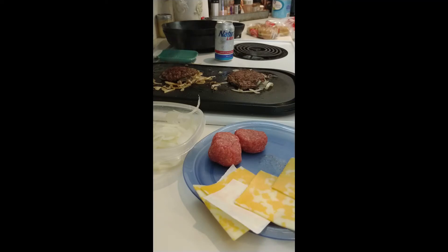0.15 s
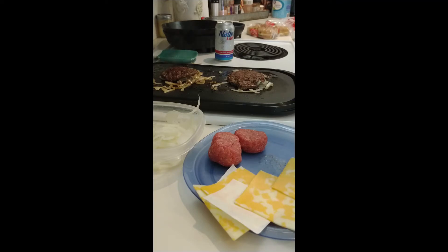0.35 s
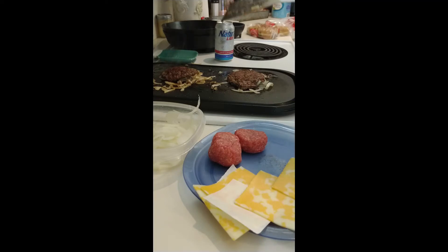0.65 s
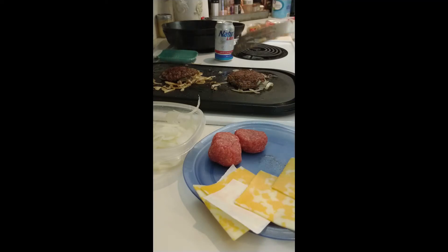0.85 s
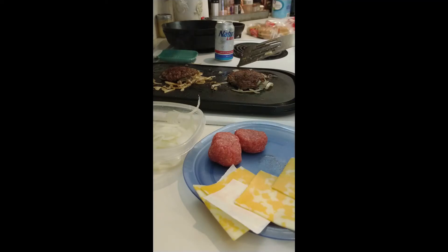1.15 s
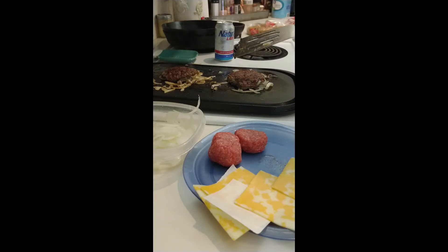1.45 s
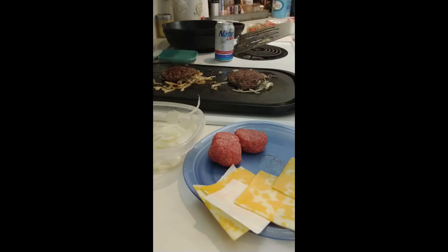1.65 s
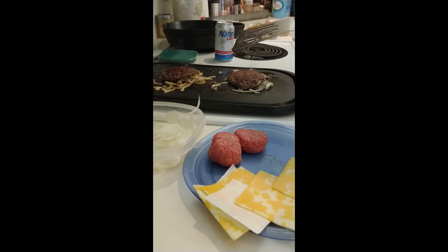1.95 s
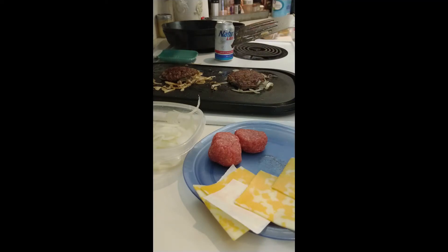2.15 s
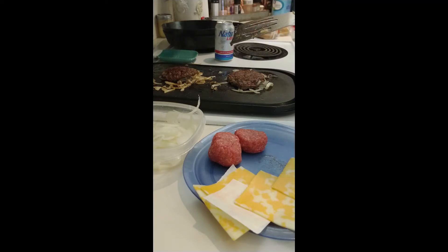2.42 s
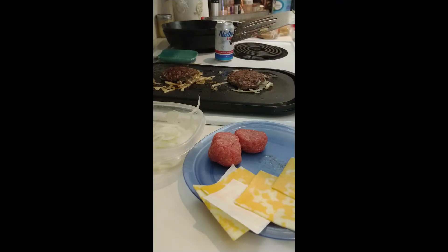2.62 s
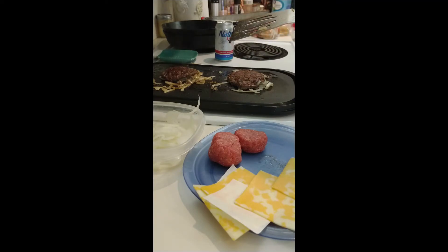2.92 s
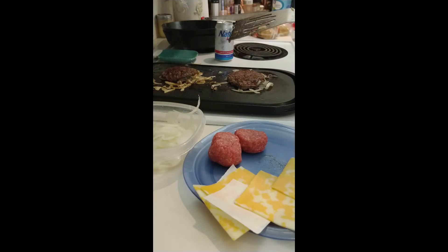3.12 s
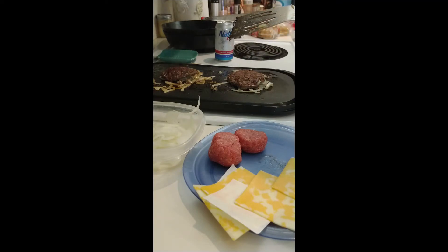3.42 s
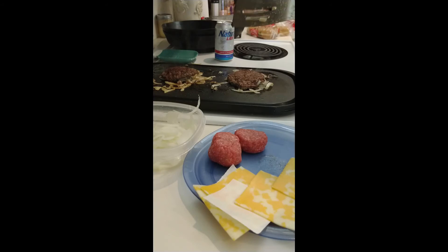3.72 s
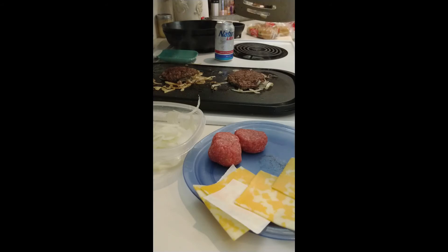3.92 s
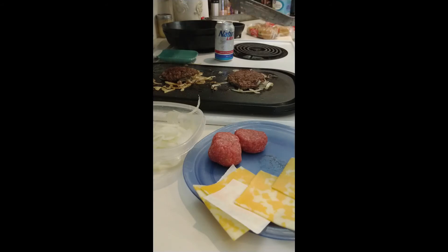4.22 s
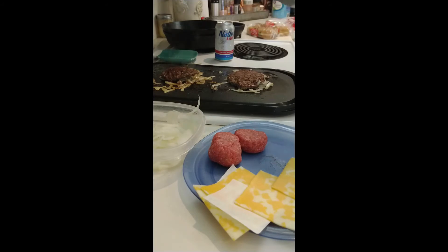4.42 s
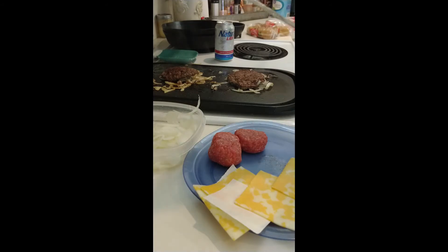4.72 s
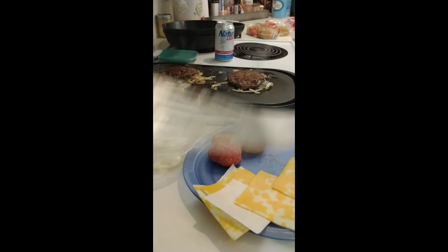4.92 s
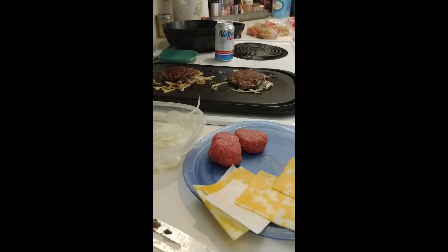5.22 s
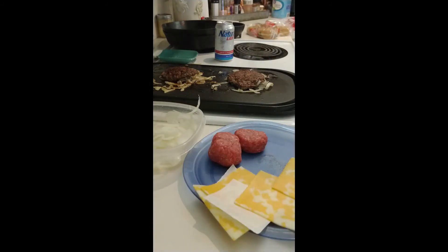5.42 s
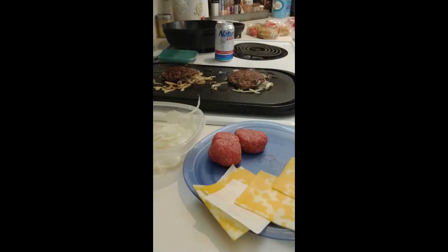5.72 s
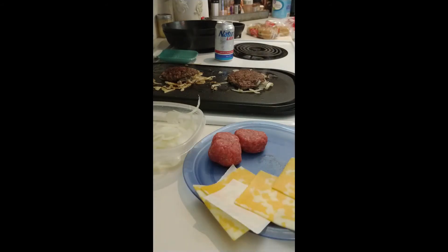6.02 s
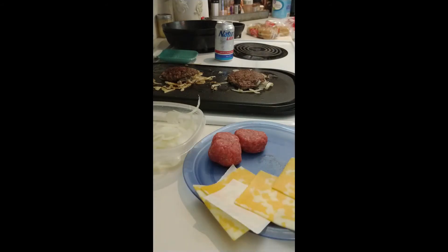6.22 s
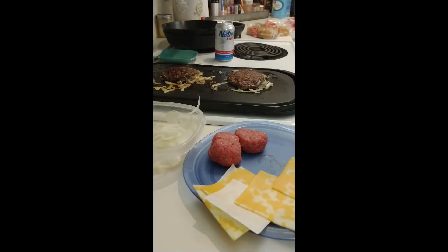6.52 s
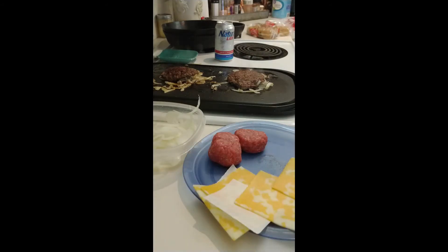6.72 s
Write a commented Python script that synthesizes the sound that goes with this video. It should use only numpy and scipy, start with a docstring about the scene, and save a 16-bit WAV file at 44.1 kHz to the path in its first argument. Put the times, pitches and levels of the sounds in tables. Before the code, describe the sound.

From the start, burgers and onions are already frying on a griddle straight ahead, close and wide in stereo, in a small kitchen. The sizzle is bright and dense, fine fizz over grainy crackle, with faint low bubbling in irregular surges. It is briskest around 0.75 s, dips briefly near 3.5 s, recovers, and eases around 5 s. Sharper spits snap at about 0.4, 0.5, 1.7, 2.3, 3.8 and 4.9 s, with weaker ones between. Soft, low, downward-sagging plops come at 0.2, 0.65, 1.1, 1.6, 2.5 and 4.6 s, among others. At 5.85 s a metal spatula touches the counter with a clank and tiny scrape, drops harder at 5.98-6.01 s, then rattles with woody thuds until 6.19 s. Its short boom fades into the room; the sizzle goes on, a little weaker, to about 7 s over barely audible rumble.

```python
"""Burger patties and onions sizzle on an electric griddle in a small kitchen, in spurts, with louder spits
and soft low plops; near the end a metal spatula is put down on the counter, drops and rattles to rest.
Sizzle: tens of thousands of random bubble bursts a second, by size class, through dense reflections.
Spits are filtered clicks, plops gliding sines; the spatula is struck modes, noise ticks and rasps.
A closely spaced microphone pair with stereo widening hears the griddle; faint rumble lies below."""
import sys
import numpy as np
from scipy import signal
from scipy.fft import rfft, irfft
from scipy.io import wavfile

SR = 44100
rng = np.random.default_rng(int(sys.argv[2]) if len(sys.argv) > 2 else 0)


def log_audio(samples):
    """Write samples as a 16-bit WAV file to the path given in sys.argv[1]."""
    # one column per channel
    frames = np.atleast_2d(samples).T
    # limit to full scale, then quantise
    limited = np.clip(frames, -1, 1)
    pcm = np.round(limited * 32767).astype(np.int16)
    wavfile.write(sys.argv[1], SR, pcm)


N = 302516

MIC_LAG_S = 20 / 44100  # travel time between the microphones
CONTACT_S = 0.00097  # build-up time of a metal contact


def from_db(db):
    """Decibels to amplitude gain."""
    return 10 ** (np.asarray(db) / 20)


def pan(left_over_right_db):
    """Left and right gains for a level difference."""
    return from_db([[left_over_right_db / 2], [-left_over_right_db / 2]])


def rms_one(x):
    """Scale so that the mean of the channels has rms 1."""
    return x / np.sqrt(np.mean(np.atleast_2d(x).mean(0) ** 2) + 1e-20)


def at_hz(points, hz):
    """Read a table on a log-frequency axis."""
    points = np.array(points)
    return np.interp(np.log(hz + 1), np.log(points[:, 0]), points[:, 1])


def drift(corner_hz):
    """Slow random wander of rms 1: noise through a double pole, computed at SR / 40."""
    step = 40
    r = np.exp(-2 * np.pi * corner_hz * step / SR)
    noise = rng.standard_normal(N // step + 2002)
    slow = signal.lfilter([1], [1, -2 * r, r * r], noise)[2000:]  # settled part
    return np.interp(np.arange(N) / step, np.arange(len(slow)), rms_one(slow))


def colour(x, spectrum):
    """Causal minimum-phase filter with the given spectrum, by folding its cepstrum."""
    size = 4096
    level_db = at_hz(spectrum, np.fft.rfftfreq(size, 1 / SR))
    cepstrum = irfft(np.log(from_db(level_db)))
    fold = np.r_[1, np.full(size // 2 - 1, 2), 1, np.zeros(size // 2 - 1)]
    response = irfft(np.exp(rfft(cepstrum * fold)))
    return signal.oaconvolve(x, response[None], axes=1)[:, :x.shape[1]]


def diffuse(size):
    """White stereo noise with the left-right correlation of diffuse sound at the pair."""
    # diffuse field at the microphones: f/Hz, correlation
    likeness = [(100, 0.28), (220, 0.034), (320, 0.51), (450, -0.34), (700, 0.63), (1100, -0.3),
                (1600, 0.59), (2300, -0.88), (3300, 0.59), (5000, -0.084), (15000, 0.16)]
    mid, side = rfft(rng.standard_normal((2, size)))
    alike = np.clip(at_hz(likeness, np.fft.rfftfreq(size, 1 / SR)), -1, 1)
    common = np.sqrt(1 + alike) * mid
    opposite = np.sqrt(1 - alike) * side * [[1], [-1]]
    return irfft((common + opposite) / np.sqrt(2), size)


def scatter(t60_s):
    """A dying cloud of reflections with energy of about 1 per channel."""
    t = np.arange(SR // 2) / SR
    decay = from_db(-60 * t / t60_s)
    return diffuse(len(t)) * decay / np.linalg.norm(decay)


def through(x, response):
    """Send a signal through a stereo impulse response."""
    return signal.fftconvolve(np.atleast_2d(x), response, axes=1)[:, :N]


def strikes(times_s, levels_db):
    """One click per event."""
    clicks = np.zeros(N)
    clicks[np.round(times_s * SR).astype(int)] = from_db(levels_db)
    return clicks


def resonate(x, peaks):
    """A chain of peaking filters, one per resonance."""
    for hz, width_hz, boost_db in peaks:
        w = 2 * np.pi * hz / SR
        a = np.pi * width_hz / SR * np.sinc(2 * hz / SR)
        g = from_db(boost_db)
        x = signal.lfilter([1 + a * g, -2 * np.cos(w), 1 - a * g], [1 + a, -2 * np.cos(w), 1 - a], x)
    return x


def rumble(level_db=-71.5, waver_db=1.8, flutter_db=2.0, pan_db=-4.0):
    """Faint low kitchen noise: coloured diffuse noise with a slow waver and a faster flutter."""
    # colour of the rumble: f/Hz, relative level/dB
    rumble_colour = [(25, -20), (60, -23), (90, -11), (118, -2.5), (155, 2), (195, -3), (280, 9.5),
                     (350, 4), (410, 1.5), (510, -12.5), (900, -43)]
    floor = rms_one(colour(diffuse(N), rumble_colour))
    wander_db = level_db + waver_db * drift(3.1) + flutter_db * drift(22)
    return floor * from_db(wander_db) * pan(pan_db)


def ring(times_s, levels_db, modes, detune):
    """Each contact excites decaying modes, each with a random strength and slight pitch shift."""
    # phase by which modes reach the left microphone late: f/Hz, phase/rad
    left_late = [(130, 1.2), (230, 1.8), (340, 1.9), (450, 1.3), (600, 1.0), (1100, 1.1)]
    uneven_db = 1.5
    out, t = np.zeros((2, N)), np.arange(SR // 3) / SR
    hz, mode_db, t60_s, pan_db = np.transpose(modes)[:, :, None]
    left = from_db(pan_db / 2) * np.exp(-1j * at_hz(left_late, hz))
    sides = np.hstack([left, from_db(-pan_db / 2)]).T
    decay = from_db(mode_db - 60 * t / t60_s)
    # low modes take longer to build up: half a cycle on top of the contact
    envelope = decay * (1 - np.exp(-(t / (CONTACT_S + .5 / hz)) ** 2))
    for s, level_db in zip(times_s, levels_db):
        start = round(s * SR)
        strength, shift = rng.standard_normal((2, len(modes)))
        tones = envelope * np.exp(2j * np.pi * hz * (1 + detune * shift[:, None]) * t)
        gains = sides * from_db(level_db + uneven_db * strength)
        out[:, start:start + len(t)] += np.imag(gains @ tones)
    return out


def handle(counter_db=-2, knock_db=-1, knock_pan_db=-7, rattle_db=-11, rattle_t60_s=0.051):
    """The handle bounces on the counter: a dull pulse each time, then the boom of the counter's modes."""
    # bounces, before the common offsets: t/s, boom/dB, body/dB, hard knock/dB
    thuds = [(5.853, -49, -36, -32), (5.861, -32, -27, -36), (5.87, -55, -45, -24.5),
             (5.98, -52, -32, -24.5), (5.99, -30, -27.5, -24), (6.0124, -22.5, -23.5, -20.5),
             (6.067, -22, -30, -26.5), (6.076, -30, -24, -24.5), (6.085, -31, -36, -28.5),
             (6.111, -30, -19.5, -28), (6.134, -40, -31, -34), (6.16, -44, -34, -33.5),
             (6.189, -44, -50, -45)]
    # where boom, body and hard knock drive the modes: f/Hz
    thud_hz = (150, 330, 500)
    # counter modes: f/Hz, relative level/dB, t60/s, left over right/dB
    counter = [(131, -3, 0.13, -9), (165.5, -8.5, 0.25, -7), (214.4, -11.5, 0.26, -10), (306, -8, 0.1, -9),
               (312.4, -13, 0.22, -6), (334, 0, 0.14, -3.5), (406, -9.5, 0.082, -13),
               (456, -7, 0.092, -10.5), (516, -14.5, 0.21, 9), (559, -10, 0.17, 3.5), (627, -18.5, 0.3, -3),
               (690, -24, 0.1, -7), (757, -12, 0.056, -3), (930, -15, 0.056, 2)]
    # colour of a dull knock: f/Hz, relative level/dB
    knock_colour = [(25, -24), (65, -44), (95, -32), (130, -4), (260, -1), (480, 6), (700, 7.5), (900, 3),
                    (1450, 1.5), (2200, -27), (3500, -26), (8000, -54)]
    times_s, *_, hard_db = np.transpose(thuds)
    mode_hz = np.array(counter)[:, 0]
    drive_db = [at_hz(list(zip(thud_hz, levels_db)), mode_hz) + counter_db for _, *levels_db in thuds]
    rattle = from_db(rattle_db) * scatter(rattle_t60_s)
    pulse = colour(signal.unit_impulse(rattle.shape[1]) + rattle, knock_colour)
    knock = through(strikes(times_s, hard_db + knock_db), pulse / np.abs(pulse).max())
    boom = ring(times_s, drive_db, counter, detune=0.0048)
    return boom + knock * pan(knock_pan_db)


def skids(times_s, levels_db):
    """Contact force: at each touch the metal skids and chatters for a few milliseconds."""
    force, t = np.zeros(N), np.arange(1, SR // 20) / SR
    for s, level_db in zip(times_s, levels_db):
        chatter = rng.standard_normal(len(t)) * t * np.exp(-t / CONTACT_S)
        start = round(s * SR)
        force[start:start + len(t)] += from_db(level_db) * chatter / np.linalg.norm(chatter)
    return force


def blade(clank_db=-10.5, tick_db=8):
    """The blade's modes clank, and its skidding edge ticks at each touch."""
    # touches, before the common offsets: t/s, clank/dB, edge tick/dB
    clanks = [(5.851, -31, -15), (5.858, -27.5, -26), (5.862, -30, -23), (5.873, -31, -28),
              (5.978, -28, -18), (5.983, -37, -20.5), (5.991, -22, -16), (6.012, -24, -23),
              (6.066, -44, -26), (6.089, -31.5, -40), (6.11, -42, -36), (6.128, -35, -36),
              (6.187, -47, -41)]
    # blade modes: f/Hz, relative level/dB, t60/s, left over right/dB
    blade_modes = [(816, -4.5, 0.097, 3), (1090, -7, 0.04, -8), (1125, 6.5, 0.074, -12),
                   (1147, 3.5, 0.079, 16), (1220, -14, 0.031, 1), (1360, 4, 0.033, 0), (1490, 2, 0.034, -2),
                   (1740, -8, 0.065, -7), (2750, -19, 0.024, 3)]
    # colour of an edge tick: f/Hz, relative level/dB
    tick_colour = [(40, -38), (130, -24), (400, 4), (1200, 6), (2000, 9), (3200, 9), (6000, -10),
                   (11000, -13), (16000, -21)]
    times_s, clank_levels_db, tick_levels_db = np.transpose(clanks)
    clank = ring(times_s, clank_levels_db + clank_db, blade_modes, detune=0.02)
    force = skids(times_s, tick_levels_db + tick_db)
    return clank + through(force, colour(scatter(0.037), tick_colour))


def scrapes():
    """The steel edge slides a little: short swells of bright noise."""
    # slides: t/s, level/dB, swell/s
    slides = [(5.856, -34, 0.0049), (5.88, -40, 0.008), (6.153, -37, 0.0083)]
    # colour of a scrape: f/Hz, relative level/dB
    scrape_colour = [(1500, -32), (3000, -3), (5200, 1), (9000, 1), (16000, -15)]
    stroke = 0
    for s, level_db, swell_s in slides:
        age = np.maximum(np.arange(N) / SR - s, 0) / swell_s
        stroke = stroke + from_db(level_db) * (age * np.exp(1 - age)) ** 2
    return stroke * rms_one(colour(diffuse(N), scrape_colour))


def spatula(handle_room_db=-8, steel_room_db=-9, room_t60_s=0.46):
    """Blade and handle come down in turn, and the kitchen rings on as diffuse reflections."""
    wood = handle()
    steel = blade() + scrapes()
    send = from_db(handle_room_db) * wood + from_db(steel_room_db) * steel
    return wood + steel + through(send, scatter(room_t60_s))


def plops(swell_s=0.0079, glide_per_s=0.85, rough=0.58, room_db=-4, room_t60_s=0.19):
    """Soft low blips: sines that swell and sag in pitch, with a rough level."""
    # plops: t/s, peak before roughness/dB, starting f/Hz
    blips = [(0.197, -56, 385), (0.654, -52, 283), (1.124, -55, 294), (1.434, -60, 404), (1.618, -57, 282),
             (2.522, -56, 280), (2.644, -62, 280), (2.775, -63.5, 413), (2.835, -58, 278),
             (4.571, -50.5, 270), (5.389, -61, 438)]
    out, t = np.zeros(N), np.arange(SR // 5) / SR
    swell = (t / swell_s * np.exp(1 - t / swell_s)) ** 2
    for s, level_db, hz in blips:
        start = round(s * SR)
        tone = np.sin(2 * np.pi * hz * t * (1 - glide_per_s * t))
        out[start:start + len(t)] += from_db(level_db) * swell * tone
    out = out * (1 + rough * drift(43))
    # left microphone first, then the room answers
    direct = np.array([out, np.roll(out, round(MIC_LAG_S * SR))])
    return direct + from_db(room_db) * through(out, scatter(room_t60_s))


def griddle_path(near_t60_s, room_db, room_t60_s=0.076):
    """One burst as heard: reflections off the stove top, the room, then the widened microphone pair."""
    # colour of the bursts: f/Hz, relative level/dB
    burst_colour = [(400, -32.5), (560, -18), (700, -14), (830, -17), (1000, 0.5), (1450, -2.5),
                    (2200, -4.5), (3000, -9), (4300, -3), (5700, -1.5), (8000, -2), (10500, 6),
                    (13000, 1.5), (15500, -4)]
    # fixed resonances round the griddle, in phase at the microphones: f/Hz, width/Hz, boost/dB
    in_phase = [(1140, 75, 5), (1570, 100, 4), (1779, 100, 10), (2120, 140, -9), (2350, 200, 3),
                (2557, 110, 4.5), (2750, 160, 2), (3056, 100, 6.5), (3250, 90, 2.5), (3378, 100, 7),
                (3600, 130, -4), (3750, 70, 2), (4050, 150, -2), (4400, 250, -5), (4965, 85, 4),
                (5450, 80, 1.5), (5652, 75, 3.5), (6120, 170, 4), (6520, 220, -3), (6900, 250, 2),
                (7402, 100, 2), (7630, 90, 1.5), (7895, 200, 4), (8650, 400, -3), (10297, 100, 1.2),
                (10700, 300, 3)]
    # the same in opposite phase: f/Hz, width/Hz, boost/dB
    opposed = [(1250, 350, 3.5), (1795, 110, 12), (2370, 200, 4.5), (3150, 200, -3), (3510, 100, 4),
               (3940, 100, 2), (4110, 120, 4), (6250, 150, 4), (8150, 250, 4), (8900, 500, -2),
               (12300, 700, 3)]
    # share of each channel taken off the other: f/Hz, level/dB
    widening = [(1000, -2), (2500, -17), (5500, -7.5), (13000, -12)]
    reflections = scatter(near_t60_s) + from_db(room_db) * scatter(room_t60_s)
    left, right = colour(reflections, burst_colour)
    mid = resonate(left + right, in_phase)
    side = resonate(left - right, opposed)
    pair = rfft(np.array([mid + side, mid - side]) / 2)
    # the share taken off is late by the travel time between the microphones
    hz = np.fft.rfftfreq(len(mid), 1 / SR)
    crossfeed = from_db(at_hz(widening, hz)) * np.exp(-2j * np.pi * hz * MIC_LAG_S)
    return irfft(pair - crossfeed * pair[::-1], len(mid))


def spits(dull_hz=9000):
    """Single drops of fat spit briefly: clicks through a dulled griddle path, ringing in the room."""
    # spits: t/s, peak/dB
    drops = [(0.3955, -27), (0.478, -24), (1.348, -34), (1.41, -33), (1.7147, -28), (2.3, -25),
             (3.045, -32), (3.3667, -30), (3.839, -27), (4.9172, -30), (5.453, -29)]
    dulling = signal.butter(2, dull_hz, fs=SR, output="sos")
    path = signal.sosfilt(dulling, griddle_path(near_t60_s=0.0038, room_db=2.5))
    return through(strikes(*np.transpose(drops)), path / np.abs(path).max())


def frying(band_hz, per_s, spurt_db, spurt_hz, size_db, count):
    """One bubble size bursts at random at several spots, each with its own spurts and lulls; rms 1."""
    out, band = 0, signal.butter(4, band_hz, "band", fs=SR, output="sos")
    for _ in range(count):
        sizes = from_db(size_db * np.minimum(rng.exponential(1, N), 5)) * rng.choice([-1, 1], N)
        happens = rng.random(N) < per_s / SR  # per_s counts one spot
        bursts = sizes * happens * from_db(spurt_db * np.tanh(drift(spurt_hz)))
        path = signal.sosfilt(band, griddle_path(near_t60_s=0.0053, room_db=-1.0))[:, :SR // 5]
        # already under way at the start
        running = np.pad(bursts, (path.shape[1] - 1, 0), "wrap")
        out = out + signal.oaconvolve(running[None], path, "valid", axes=1)
    return rms_one(out)


def gurgle(follows=1.07):
    """Faint low bubbling under the sizzle: random bursts in narrow bands of uneven level."""
    # quarter-octave bands: f/Hz, level/dB
    bands = [(430, -81), (620, -81), (730, -70.5), (830, -61)]
    # uneven level of the faint low bubbling, used less its mean and times follows: t/s, level/dB
    gurgle_level = [(0.08, -72), (0.51, -62), (0.83, -67), (0.97, -58), (1.16, -68), (1.25, -60),
                    (1.39, -65), (1.59, -56.5), (1.86, -65.5), (1.95, -63.5), (2.17, -71), (2.46, -56),
                    (2.56, -65), (2.74, -56), (2.99, -68), (3.07, -63.5), (3.22, -71), (3.35, -64),
                    (3.46, -73), (3.64, -61), (3.79, -64), (4.03, -56), (4.15, -70.5), (4.33, -57.5),
                    (4.41, -64), (4.51, -57.5), (4.59, -62.5), (4.69, -59.5), (5.01, -65), (5.12, -59),
                    (5.24, -66.5), (5.46, -58), (5.56, -67), (5.7, -59.5)]
    uneven_db = np.interp(np.arange(N) / SR, *np.transpose(gurgle_level))
    edges = np.array([2 ** (-1 / 8), 2 ** (1 / 8)])
    bubbles = 0
    for hz, level_db in bands:
        boil = frying(hz * edges, per_s=170, spurt_db=9.5, spurt_hz=8.9, size_db=3, count=1)
        bubbles = bubbles + from_db(level_db) * boil
    return bubbles * from_db(follows * (uneven_db - uneven_db.mean()))


def sizzle():
    """Large bubbles sound low and come seldom; small ones merge into a hiss and follow the vigour most."""
    # how briskly the fat fries: t/s, level about the usual fizz/dB
    vigour = [(0, -1), (0.35, -0.1), (0.75, 1), (1.05, 0.2), (1.45, 0.5), (2.05, 0), (2.3, -0.2),
              (3.25, -0.3), (3.5, -2), (3.72, 0.3), (4.15, -0.5), (4.4, -1), (4.95, -2), (5.35, -1.3),
              (5.7, -0.5), (6.15, -1.2), (6.55, -3), (6.85, -2)]
    vigour_db = np.interp(np.arange(N) / SR, *np.transpose(vigour))
    # each gain: level at usual vigour in dB, plus a share of the vigour's swing
    low, middle = from_db(-46.5 + 0.092 * vigour_db), from_db(-44 + 0.59 * vigour_db)
    high, top = from_db(-40 + vigour_db), from_db(-45.5 + 1.16 * vigour_db)
    bubbling = low * frying((900, 2100), per_s=560, spurt_db=5.0, spurt_hz=13.7, size_db=2.0, count=6)
    crackle = middle * frying((2100, 4600), per_s=1600, spurt_db=4.5, spurt_hz=23.6, size_db=1.0, count=6)
    fizz = high * frying((4600, 9000), per_s=1800, spurt_db=4.0, spurt_hz=31, size_db=2.0, count=5)
    finest = top * frying((9000, 19000), per_s=2400, spurt_db=4.0, spurt_hz=16, size_db=0.8, count=4)
    return gurgle() + bubbling + crackle + fizz + finest


def scene(griddle_pan_db=0.1):
    """Griddle almost straight ahead, with plops, spatula and room."""
    griddle = (sizzle() + spits()) * pan(griddle_pan_db)
    return griddle + plops() + spatula() + rumble()


def record(dry):
    """The microphones roll off the deep bass, and the top is cut steeply."""
    thin = signal.sosfilt(signal.butter(2, 85, "high", fs=SR, output="sos"), dry)
    return signal.sosfilt(signal.ellip(12, .2, 80, 15850, fs=SR, output="sos"), thin)


dry = scene()
out = record(dry)
log_audio(out)
```